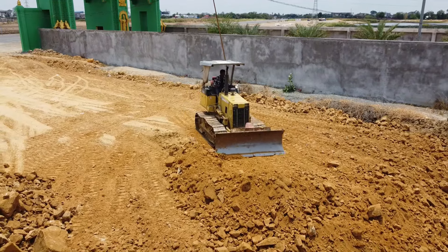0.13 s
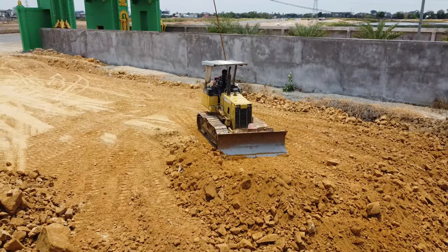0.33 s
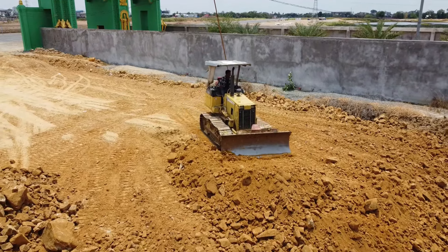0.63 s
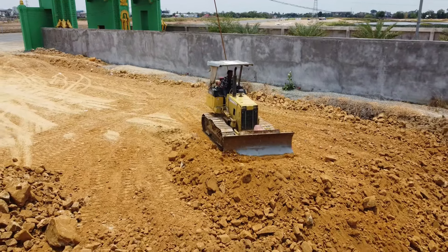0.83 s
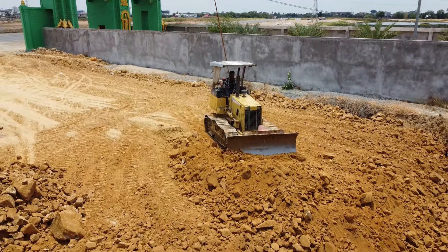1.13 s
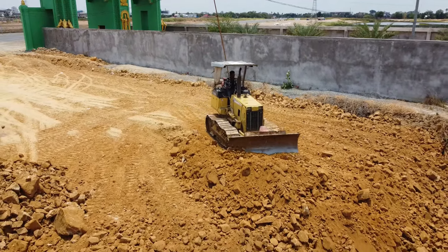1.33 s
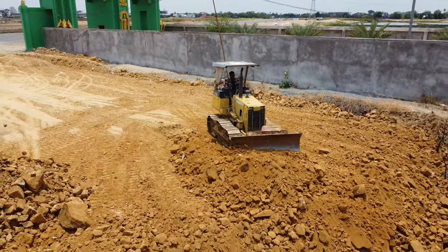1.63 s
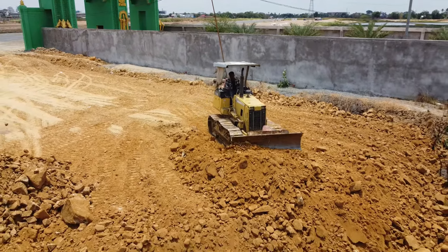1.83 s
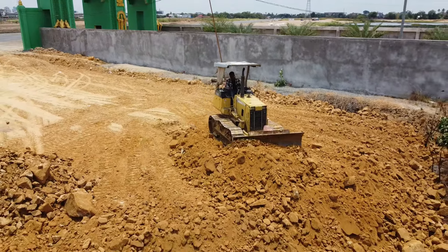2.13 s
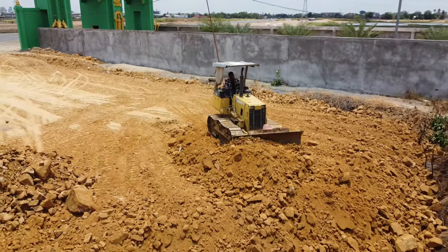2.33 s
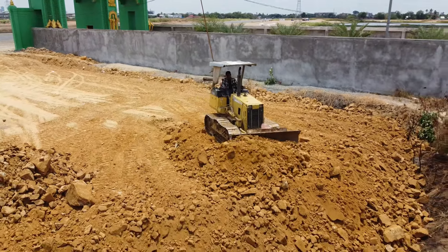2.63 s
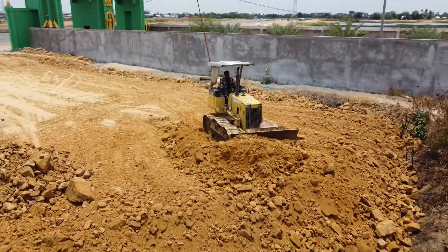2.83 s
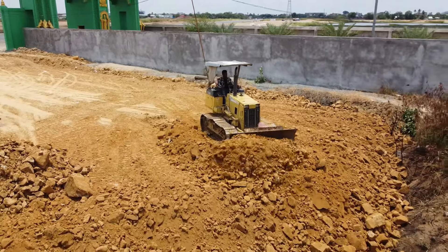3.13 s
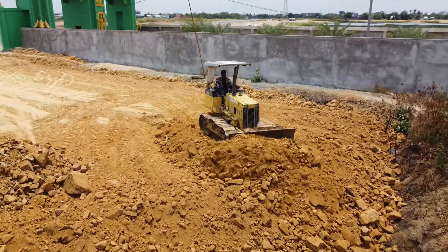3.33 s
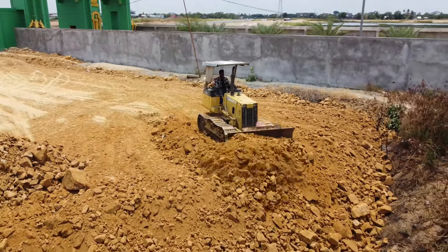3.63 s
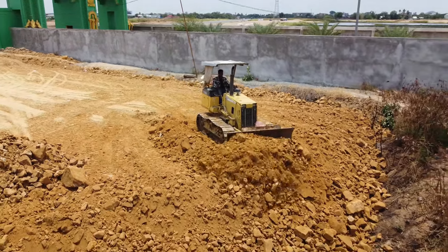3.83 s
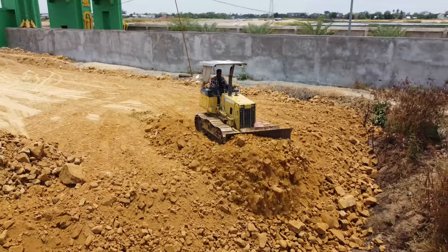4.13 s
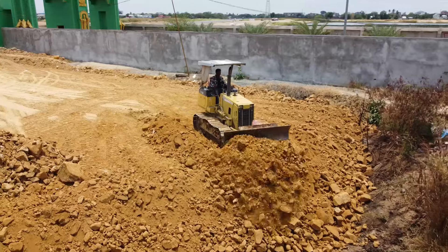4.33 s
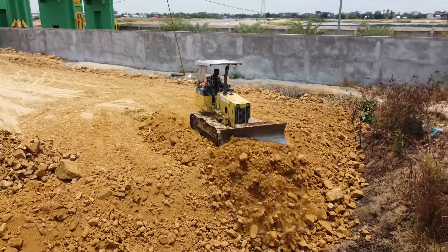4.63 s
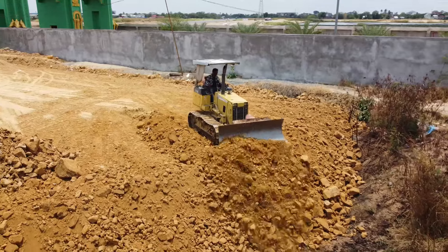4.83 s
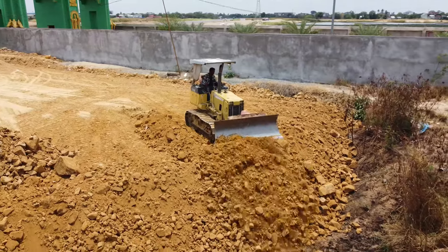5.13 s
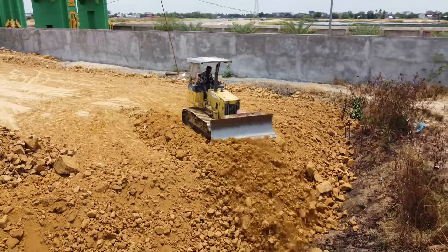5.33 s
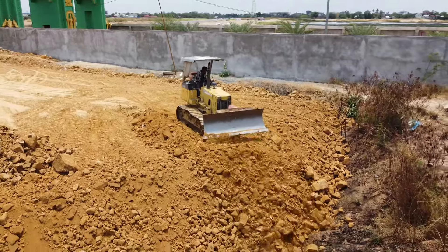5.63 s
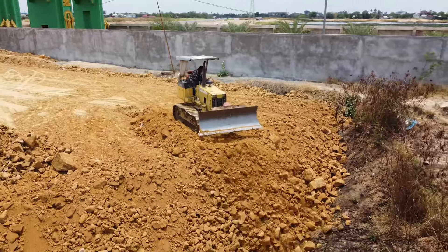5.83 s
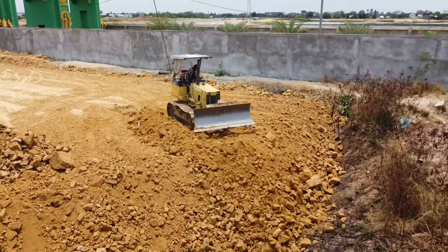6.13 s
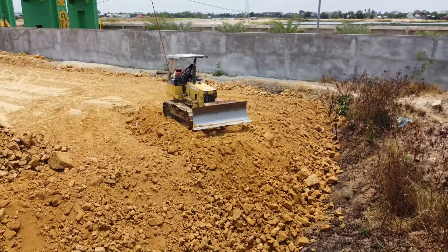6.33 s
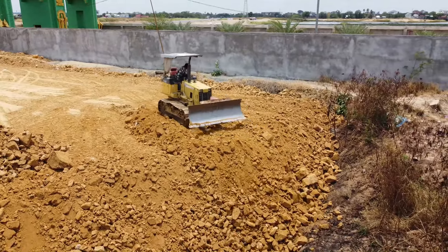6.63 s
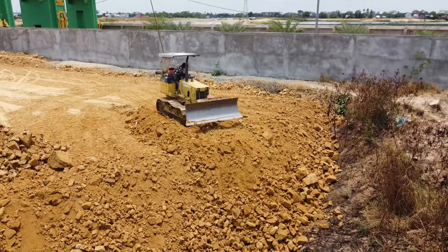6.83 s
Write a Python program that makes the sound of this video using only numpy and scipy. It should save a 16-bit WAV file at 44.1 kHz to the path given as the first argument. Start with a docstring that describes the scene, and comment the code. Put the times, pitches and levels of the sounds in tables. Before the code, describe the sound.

Open ground beside a wall, microphone some metres from a crawler bulldozer. A strong low diesel hum, around 110 hertz and wavering slightly, runs from start to finish over rough exhaust roar, rumble and uneven hiss. From 0.2 to 2 seconds steel track links clank and grind every tenth of a second or so, mixed with short raspy squeaks, densest around 1.1 to 1.7; faint gear whine sits beneath. The roar drops near 1.7, and from 2.2 to 4 it is calmer, with sparse soft clanks, thin whines and tiny very high chirps. Around 4 the engine swells again. A low thud falls at 5.0, then bright clanks and squeaks crowd 5.2 to 5.7 over a clearer gear whine. Scattered scraping and squeaks follow, and dull heavy thumps cluster at 6.7 to 6.9. The steel has a faint short echo.

```python
"""Open ground, some metres from a crawler bulldozer pushing earth; a wall and the ground answer the steel faintly.
The diesel is one strong firing sine with weak shaft orders over a roar of shaped noise that puffs at each firing.
Steel tracks clank (noise through link resonances), squeak (raspy gliding tones) and hiss (patchy noise and pings)
in bursts as links pass the sprockets. Gears whine as thin sines, a roller chirps, blade and rock thud as decaying sines."""
import sys
import numpy as np
from scipy import signal
from scipy.fft import rfft, irfft, next_fast_len
from scipy.io import wavfile
from scipy.ndimage import uniform_filter1d, map_coordinates

SR = 44100
rng = np.random.default_rng(int(sys.argv[2]) if len(sys.argv) > 2 else 0)


def output_pcm(signal):
    """Save a mono or channel-first signal as 16-bit PCM at the path in sys.argv[1].

    Samples are clipped to [-1, 1] before scaling.
    """
    pcm = np.clip(np.atleast_2d(signal).T, -1, 1) * 32767
    wavfile.write(sys.argv[1], SR, np.round(pcm).astype(np.int16))


N = 307818
TIME = np.arange(N) / SR
TOP_HZ = 9470  # band limit


def amp(db):
    """Decibels to gain."""
    return 10 ** (np.asarray(db) / 20)


def unit(x):
    """Scale to rms 1."""
    return x / np.sqrt(np.mean(x ** 2) + 1e-20)


def along(points, hz):
    """Interpolate (Hz, value) points on a log frequency axis."""
    f, v = np.transpose(points)
    return np.interp(np.log(hz + 1), np.log(f + 1), v)


def curves(rows):
    """One value per sample for each column after the time."""
    s, *cols = np.transpose(rows)
    return [np.interp(TIME, s, c) for c in cols]


def wobble(rate_hz, count=N):
    """Smooth random curve with rate_hz knots a second."""
    knots = rng.standard_normal(int(count * rate_hz / SR) + 4)
    return map_coordinates(knots, [np.arange(count) * rate_hz / SR])


def filtered(x, response):
    """Apply a frequency response to x."""
    m = next_fast_len(x.shape[-1] + 4096)
    spectrum = rfft(x, m) * response(np.fft.rfftfreq(m, 1 / SR))
    return irfft(spectrum, m)[..., :x.shape[-1]]


def rush(spectrum, patchy_db):
    """Coloured noise of rms 1, with random gain patches in time and frequency."""
    z = signal.stft(rng.standard_normal(N + 512), nperseg=512)[2]
    field = uniform_filter1d(rng.standard_normal(z.shape), 4, 0)
    field = uniform_filter1d(field, 8, 1)
    noise = signal.istft(z * amp(patchy_db * unit(field)), nperseg=512)[1][:N]
    return unit(filtered(noise, lambda hz: amp(along(spectrum, hz))))


def add(out, s, sound):
    """Mix a sound in at s seconds."""
    part = out[round(s * SR):][:len(sound)]
    part += sound[:len(part)]


def yard(x):
    """A wall and the ground give a short scattered answer: a decaying noise tail."""
    t = TIME[:SR // 4]
    t60_s = 0.42
    tail = unit(rng.standard_normal(len(t)) * amp(-60 * t / t60_s)) / np.sqrt(len(t))
    return signal.fftconvolve(x, tail)[:N]


# Gears and pumps whining: (start [s], end [s], pitch [Hz], level [dB])
GEAR_WHINES = [(0, 1.7, 475, -38), (1.05, 2.13, 525, -39.5), (2.8, 3.95, 387.5, -41),
               (2.9, 3.9, 428, -46.5), (3.0, 3.65, 1600, -49.5), (2.9, 4.6, 730, -44),
               (4.9, 6.4, 600, -39.5), (4.9, 6.4, 800, -36), (5.3, 5.9, 380.7, -37)]


def whines():
    """Thin tones that waver in pitch and strength and fade in and out."""
    out = np.zeros(N)
    fade_s, waver_db, drift_hz = 0.19, 1.7, 2
    for start, end, hz, db in GEAR_WHINES:
        t = TIME[:int((end - start) * SR)]
        fade = np.clip(np.minimum(t, end - start - t) / fade_s, 0, 1)
        waver, drift = wobble(12, count=len(t)), wobble(9, count=len(t))
        tone = np.sin(2 * np.pi * np.cumsum(hz + drift_hz * drift) / SR)
        add(out, start, fade * amp(db + waver_db * waver) * np.sqrt(2) * tone)
    return out


# Dull thumps of the blade and falling rock: (time [s], pitch [Hz], level [dB], t60 [s])
BLADE_THUDS = [(.64, 149, -33, .25), (5.023, 150, -14, 0.25), (6.72, 89.2, -14.5, 0.34),
               (6.748, 203, -13, 0.14), (6.918, 70, -14.5, 0.25)]


def thuds():
    """Low, quickly damped push."""
    out, t = np.zeros(N), TIME[:SR // 2]
    rise_s = 0.014
    for s, hz, db, t60 in BLADE_THUDS:
        shape = amp(db - 60 * t / t60) * np.clip(t / rise_s, 0, 1)
        add(out, s, shape * np.sin(2 * np.pi * hz * t))
    return out


OVERTONE_DB, OVERTONE_SCATTER_DB = -15, 5  # step per overtone; its spread from squeak to squeak


def squeak(length_s, hz, change_percent, rasp_hz):
    """Stick-slip tone: gliding pitch made raspy by uneven slips that come in spurts, with a short ring-out."""
    t = TIME[:int((length_s + .06) * SR)]
    glide = 1 + change_percent / 100 * np.clip(t / length_s, 0, 1)
    turn = 2 * np.pi * np.cumsum(hz * glide) / SR
    knots = rng.standard_normal((3, 256))
    rates_hz = (2 * rasp_hz, 2 * rasp_hz, 55)
    swell, drift, spurts = (map_coordinates(k, [t * r], mode="mirror") for k, r in zip(knots, rates_hz))
    slips = (1 + .8 * (swell + 1j * drift)) * amp(2.2 * spurts)
    rise = np.clip(t / 0.0029, 0, 1)
    ring_out_t60_s = 2.1 * length_s + 0.0076
    shape = rise * amp(-60 * np.clip(t - 0.6 * length_s, 0, None) / ring_out_t60_s)
    fall_db = OVERTONE_DB + OVERTONE_SCATTER_DB * np.clip(rng.standard_normal(), -2, 2)
    partials = sum(amp(fall_db * (k - 1)) * np.exp(1j * k * turn) for k in (1, 2, 3) if k * hz < TOP_HZ)
    return shape * np.real(slips * partials)


# Dry roller chirping on one pitch: (time [s], length [s], level [dB])
ROLLER_CHIRPS = [(2.356, .03, -40), (2.62, .056, -52), (2.81, .042, -37), (2.89, .058, -35.5),
                 (3.04, 0.082, -39.5), (3.17, 0.099, -47), (3.331, .06, -55), (4.056, 0.058, -40.5),
                 (4.125, .02, -37.5), (4.204, .021, -41), (4.567, .04, -34), (4.678, 0.088, -43),
                 (4.829, .015, -32.5), (4.868, 0.15, -36), (5.616, 0.022, -31), (5.888, .054, -40),
                 (6.06, .06, -36)]
ROLLER_HZ, ROLLER_RASP_HZ, ROLLER_GLIDE_PERCENT = 5724, 55, 0.93  # glide: random spread


def roller():
    """Thin, nearly level stick-slip chirps."""
    out = np.zeros(N)
    for s, length, db in ROLLER_CHIRPS:
        glide_percent = ROLLER_GLIDE_PERCENT * rng.standard_normal()
        add(out, s, amp(db) * squeak(length, ROLLER_HZ, glide_percent, ROLLER_RASP_HZ))
    return out


# Pins slipping in their bushes: (time [s], length [s], start pitch [Hz], pitch change [%], level [dB])
PIN_SQUEAKS = [(0.188, .042, 1774, -4, -25.5), (0.299, 0.051, 3930, 5.5, -28.5),
               (0.293, .02, 6470, 2.5, -20.5), (0.378, 0.026, 5000, 0, -31.5),
               (0.431, 0.022, 4900, -3, -28), (0.438, .06, 4736, 0, -32.5), (0.49, 0.028, 1170, -3, -24.5),
               (.56, .015, 5880, 1, -26), (0.669, .02, 756, 2, -20), (0.946, 0.013, 2400, 4.5, -32.5),
               (1.095, 0.054, 4130, 6, -24.5), (1.12, 0.028, 7150, 6, -25), (1.123, .015, 1910, 1, -21),
               (1.137, 0.022, 1282, -6, -20.5), (1.144, 0.071, 4490, 1, -31), (1.205, 0.021, 4450, 0, -28),
               (1.294, 0.012, 7700, -7.5, -23), (1.298, 0.019, 2400, 8, -26), (1.32, .026, 4815, -2.5, -31),
               (1.411, .02, 6690, 1.5, -22.5), (1.413, .015, 3950, 7, -18.5), (1.418, 0.031, 1862, 2, -28),
               (1.529, .03, 4810, 0, -31), (1.533, 0.043, 4280, -2.5, -26.5),
               (1.559, 0.018, 1980, -8, -20.5), (1.564, 0.032, 6900, -2, -29),
               (1.686, 0.018, 7290, 2.5, -28.5), (1.7, 0.037, 4300, -6, -21), (1.732, .03, 7400, -2, -27),
               (1.729, 0.029, 4740, 0.5, -19.5), (1.733, .036, 2095, 4, -27),
               (1.865, 0.059, 4600, -3, -29.5), (1.873, 0.028, 4180, -4.5, -23),
               (2.023, 0.078, 5400, 2, -32), (2.033, 0.073, 2516, -2.5, -29.5),
               (2.045, 0.1, 1916, -1.5, -33), (2.047, 0.044, 1304, 6, -27.5), (2.048, .054, 934, 4, -30.5),
               (2.052, 0.049, 8620, 1.5, -29), (2.208, .045, 4970, -4, -33), (2.367, 0.085, 1075, 8, -30.5),
               (2.555, .034, 4300, -6, -47.5), (2.762, 0.013, 3030, 0, -32.5),
               (2.819, .033, 6500, 5.5, -31.5), (2.827, 0.03, 2820, -3, -42), (3.077, 0.062, 6320, -7, -43),
               (3.166, 0.03, 2880, -1, -38), (4.462, 0.047, 809, 0, -25), (4.884, .008, 4310, 9, -31.5),
               (5.216, .03, 6220, 7, -25), (5.245, 0.045, 1318, 4, -22.5), (5.298, 0.062, 1370, 4, -29),
               (5.37, .016, 4060, 8, -24.5), (5.379, 0.11, 309, -14.5, -25), (5.463, 0.013, 2820, -3, -25),
               (5.464, 0.012, 3870, 1, -28.5), (5.569, .013, 8040, -0.5, -14), (5.623, .018, 4580, -7, -37),
               (5.624, .02, 2900, 2, -27), (5.908, 0.034, 8660, -2, -24.5), (5.912, .2, 7570, 1, -39),
               (5.914, 0.12, 6320, -3, -40), (5.925, 0.069, 3850, 0, -38), (6.045, .099, 8700, 0.5, -33.5),
               (6.03, 0.092, 4730, -4, -34.5), (6.056, 0.042, 6460, 5, -31), (6.194, 0.066, 992, 5.5, -22),
               (6.485, 0.064, 952.6, 3.5, -25.5), (6.538, .025, 2140, -0.5, -19),
               (6.54, 0.027, 4220, -0.5, -30), (6.587, 0.083, 5250, -8.5, -33.5),
               (6.727, .058, 1233, -0.5, -27.5)]
RASP_SHARE, RASP_LENGTH_S = .04, .03  # rasp width / pitch at this length; longer squeaks are purer


def squeaks():
    """Each pin squeaks by stick-slip on its own pitch."""
    out = np.zeros(N)
    for s, length, hz, change, db in PIN_SQUEAKS:
        rasp_hz = RASP_SHARE * hz * np.sqrt(RASP_LENGTH_S / length)
        add(out, s, amp(db) * squeak(length, hz, change, rasp_hz))
    return out


# Spectrum of small track contacts: (frequency [Hz], relative density [dB per Hz])
HISS_SPECTRUM = [(1350, -18.5), (2300, -1.5), (2570, -6), (2860, -5), (3120, -7.5), (3630, -6),
                 (4180, -9.5), (4980, -10.5), (5310, -11), (5730, -5.5), (7450, -12.5), (8630, -11.5),
                 (9310, -32.5), (12100, -66.5), (20500, -120)]


def tinkles(rate_hz=260):
    """Countless small decaying pings of track steel, cut at 50 ms; rms 1."""
    draw = rng.random((int(rate_hz * N / SR), 3))
    t = TIME[:SR // 20]
    hz = 4000 + 5200 * draw[:, 1:2]
    level_db = 12 * draw[:, 2:]
    shape = amp(level_db - 60 * t / .08) * np.clip(t / .006, 0, 1)
    pings = shape * np.sin(2 * np.pi * hz * t)
    where = (draw[:, :1] * N).astype(int) + np.arange(len(t))
    mixed = np.bincount(where.ravel(), pings.ravel())[:N]
    return unit(filtered(mixed, lambda f: amp(along(HISS_SPECTRUM, f))))


# Engine roar and track hiss (roar also used in engine_roar): (time [s], roar level [dB], hiss level [dB])
ROAR_AND_HISS = [(0, -25, -33), (.45, -25.5, -35), (.68, -23, -32), (.93, -25, -36), (1.4, -28.5, -36),
                 (1.57, -27, -34.5), (1.71, -34, -43.5), (1.87, -33, -44), (2.19, -33, -40.5),
                 (2.62, -32.5, -43), (2.88, -34, -46), (3.1, -37.5, -47.5), (3.55, -35, -46.5),
                 (3.9, -33.5, -45.5), (3.98, -29, -39), (4.2, -27, -37), (4.8, -28, -36.5),
                 (5.05, -25, -35), (5.37, -27.5, -32.5), (5.62, -24, -34), (5.85, -28.5, -33),
                 (6.34, -26.5, -36.5), (6.78, -24, -31.5), (6.98, -24, -34)]


def track_hiss():
    """Many small contacts of rolling tracks and sliding soil merge into an uneven hiss with pings in it."""
    hiss_db = curves(ROAR_AND_HISS)[1]
    flutter_db = 1.48 * wobble(14) + 0.57 * wobble(150)
    hiss = amp(flutter_db) * rush(HISS_SPECTRUM, patchy_db=2.5)
    return amp(hiss_db) * (hiss + .4 * tinkles())


# Spectrum of bare grinding: (frequency [Hz], relative density [dB per Hz])
GRIND_SPECTRUM = [(410, -24), (700, -23), (1040, -7.5), (1310, -2), (1590, 1), (1920, 4), (3220, -1.5),
                  (4090, -5.5), (6040, -2.5), (6880, 5), (9310, -34), (12100, -50.5), (20500, -120)]
# Resonances of the track steel: (frequency [Hz], width [Hz], level [dB])
LINK_MODES = [(1185, 61, 0), (1940, 150, -15.5), (2270, 23, -21.5), (2335, 130, 2.5), (2940, 26, -4),
              (3560, 89, -24.5), (3900, 13, -5.5), (4010, 80, -4.5), (4570, 72, -4.5), (5250, 220, -6),
              (5370, 16, -8.5), (5870, 77, -8.5), (6660, 97, -18.5), (6800, 38, -20), (6330, 13, -9.5),
              (7180, 670, -1.5), (7600, 45, -3.5), (8140, 47, -26.5), (8700, 54, -2), (10000, 30, -32)]
# Links grinding or knocking: (time [s], level [dB], contact [s], brightness [dB per octave])
LINK_CLANKS = [(.204, -22, 0.0084, -10), (.298, -29.5, 0.0071, 1.5), (.349, -23, 0.0092, -10),
               (.403, -27.5, .02, -1.5), (.454, -23, 0.03, 2), (.783, -21.5, 0.0044, 2.5),
               (.9, -28, 0.0029, -4), (0.95, -19.5, 0.0056, -7.5), (1.043, -33, .008, -1.5),
               (1.103, -18.5, .048, -1), (1.205, -21, 0.019, -0.5), (1.291, -20.5, 0.017, 0),
               (1.401, -15.5, 0.018, 1), (1.529, -23.5, 0.013, 1.5), (1.556, -20, .035, 1.5),
               (1.686, -24.5, 0.045, 2), (1.72, -30.5, .018, -3.5), (1.864, -27.5, 0.061, 2),
               (2.02, -24.5, 0.062, 4), (2.199, -33, 0.016, 9.5), (2.279, -34, .01, -8),
               (2.46, -37.5, .008, -7), (2.752, -27, 0.011, -1), (2.812, -26.5, .035, 6.5),
               (3.156, -40.5, .018, 6), (4.243, -29, 0.0088, -13), (4.527, -29.5, 0.0061, -2.5),
               (4.756, -28, 0.012, -6), (4.885, -20.5, 0.0058, -13), (5.033, -22.5, 0.0057, -7.5),
               (5.213, -18.5, 0.026, -0.5), (5.274, -26, 0.013, 4), (5.372, -17.5, 0.011, 2.5),
               (5.434, -24, 0.01, -2), (5.463, -26, 0.01, -7.5), (5.565, -20, .013, 4),
               (5.619, -18, 0.0092, 2.5), (5.635, -28, 0.019, -8), (5.695, -24, 0.033, -5.5),
               (5.842, -22.5, .007, -4), (5.912, -36, 0.027, 6), (6.04, -29.5, 0.076, 5),
               (6.13, -27, .025, -10.5), (6.536, -26, 0.0062, 1), (6.716, -23.5, .06, -4.5),
               (6.933, -27, 0.038, -1)]
RISE_S, RISE_SHARE = 0.0023, 0.27  # base rise; added s per s of contact
FADE_S, FADE_SHARE = 0.047, 1.2  # base t60; added s per s of contact
CRACK, CRACK_CONTACT_S, CRACK_T60_S = 0.91, .03, 0.023  # size; contact that weakens it e-fold; decay
BARE, RUNG = 0.67, 0.7  # gains of bare grit and of ringing links


def clanks():
    """Gritty noise of each contact, opened by a crack, part bare, part ringing the links at new strengths."""
    out, t, grid_hz = np.zeros(N), TIME[:SR // 4], np.linspace(0, SR / 2, 2048)

    def scale(response):
        return np.sqrt(np.mean(np.abs(response(grid_hz)) ** 2))

    for s, db, contact, tilt_db in LINK_CLANKS:
        strength_db = rng.normal(0, 4, len(LINK_MODES))
        # every contact meets other parts: own humps and gaps
        humps_db = 3.5 * map_coordinates(rng.standard_normal(80), [grid_hz / 300])

        def steel(f):
            total = 0
            for k, (centre, width, level_db) in enumerate(LINK_MODES):
                band = 1j * f * width / (centre * centre - f * f + 1j * f * width)
                total = total + (-1) ** k * amp(level_db + strength_db[k]) * band
            return total

        def slope(f):
            octaves = np.log2(np.clip(f, 600, 9000) / 4000)
            return amp(tilt_db * octaves + np.interp(f, grid_hz, humps_db))

        def bare(f):
            return amp(along(GRIND_SPECTRUM, f)) * slope(f)

        def rung(f):
            return steel(f) * slope(f)

        def both(f):
            return BARE * bare(f) / scale(bare) + RUNG * rung(f) / scale(rung)

        def wide(f):
            return np.sqrt(slope(f)) * f / (f + 300) / (1 + f / 3000)

        rise_s, t60_s = RISE_S + RISE_SHARE * contact, FADE_S + FADE_SHARE * contact
        shape = np.clip(t / rise_s, 0, 1) * amp(-60 * np.clip(t - rise_s - contact, 0, None) / t60_s)
        crack = CRACK * np.exp(-contact / CRACK_CONTACT_S) * amp(-60 * t / CRACK_T60_S)
        grit = rng.standard_normal(len(t)) * amp(2.6 * wobble(300, count=len(t)))
        grinding = filtered(grit * shape, both)
        opening = filtered(grit * crack, wide) / scale(wide)
        add(out, s, amp(db) * (grinding + opening))
    return out


# Spectra of rumble, exhaust and engine body: (frequency [Hz], relative density [dB per Hz])
RUMBLE_SPECTRUM = [(15, -43), (25, -16), (34, -2), (43, -7), (60, -3), (76, -6.5), (88, -2), (100, -2),
                   (130, -2.5), (150, -20.5), (220, -120)]
EXHAUST_SPECTRUM = [(85, -25), (145, 3.5), (183, 0.5), (280, -1), (313, -2), (453, -8), (520, -10.5),
                    (680, -32.5), (1140, -120)]
BODY_SPECTRUM = [(240, -30.5), (400, -0.5), (452, -11.5), (536, -3), (713, 0.5), (780, -0.5), (826, 0),
                 (896, -3.5), (956, -8.5), (1260, -2.5), (1770, -9.5), (1930, -9), (2250, -14), (2580, -23),
                 (2800, -19), (3640, -32.5), (6160, -120)]
USUAL_ROAR_DB = -28
EXHAUST_DB, EXHAUST_GROWS = -29.5, 1.04  # at the usual roar; dB per dB of roar
RUMBLE_DB, RUMBLE_GROWS = -33, 0.39  # likewise


def engine_roar(turn):
    """Exhaust, body and rumble noise; the body noise puffs once a firing."""
    body_db = curves(ROAR_AND_HISS)[0]
    effort_db = body_db - USUAL_ROAR_DB
    puff = unit(1 + .1 * np.cos(turn))
    shake = wobble(12)  # shared by exhaust and body
    exhaust_db = EXHAUST_DB + EXHAUST_GROWS * effort_db + 0.64 * shake
    exhaust = amp(exhaust_db) * rush(EXHAUST_SPECTRUM, patchy_db=2.0)
    body = amp(body_db + 0.6 * shake) * puff * rush(BODY_SPECTRUM, patchy_db=1.0)
    # loose panels and tumbling stones knock in short irregular bursts
    bursts = unit(np.clip(wobble(70) - 1.1, 0, .7))
    knocks = amp(body_db - 13) * bursts * rush(BODY_SPECTRUM, patchy_db=3)
    rumble_db = RUMBLE_DB + RUMBLE_GROWS * effort_db + 0.82 * wobble(6)
    rumble = amp(rumble_db) * rush(RUMBLE_SPECTRUM, patchy_db=3.5)
    return exhaust + body + knocks + rumble


# Shaft orders: (multiple of the firing rate [ratio], level re firing tone [dB])
SHAFT_ORDERS = [(2 / 3, -22.5), (4 / 3, -27), (5 / 3, -27.5), (2, -24), (3, -30), (4.5, -34)]
# Firing of the diesel: (time [s], firing rate [Hz], firing tone level [dB])
FIRING = [(0, 113.7, -17), (.35, 113.6, -15), (.78, 112.5, -13.5), (1.13, 111.1, -13.5), (1.3, 110.2, -16),
          (1.56, 111, -15), (1.8, 110, -19), (2.0, 110.3, -18), (2.8, 112.1, -17), (2.93, 115.3, -21),
          (3.15, 115.4, -19.5), (3.68, 115.5, -19), (3.85, 114.2, -18), (4.02, 110.8, -14),
          (4.3, 115, -16.5), (4.84, 117.3, -17), (5.33, 114.5, -15), (5.79, 114.4, -15.5),
          (6.35, 115.4, -17.5), (6.7, 113.2, -15.5), (6.86, 113.3, -20), (6.98, 116, -17.5)]


def engine():
    """A nearly pure firing tone, weak shaft orders, and roar tied to the same firing phase."""
    firing_hz, tone_db = curves(FIRING)
    turn = 2 * np.pi * np.cumsum(firing_hz + 0.43 * wobble(15)) / SR
    tone = np.sin(turn) * amp(0.52 * wobble(30) + 0.31 * wobble(8))
    # unequal cylinders leave unsteady lines at multiples of the shaft speed
    for multiple, db in SHAFT_ORDERS:
        tone += amp(db + 2.7 * wobble(15)) * np.sin(multiple * turn + 0.92 * wobble(10))
    return np.sqrt(2) * amp(tone_db) * tone + engine_roar(turn)


def scene():
    """Gears, blade, tracks and engine; only the track steel gets the yard's answer."""
    steel = roller() + squeaks() + clanks()
    answer = amp(-18) * yard(steel)
    return (whines() + thuds() + track_hiss() + steel + answer + engine())[None]


def record(dry):
    """Keep nothing above the band limit."""
    return filtered(dry, lambda hz: hz < TOP_HZ)


dry = scene()
out = record(dry)
output_pcm(out)
```